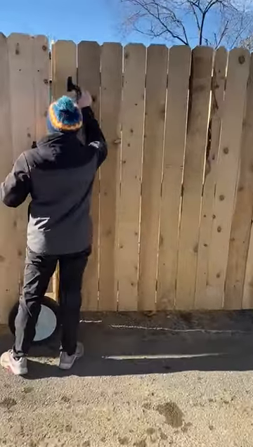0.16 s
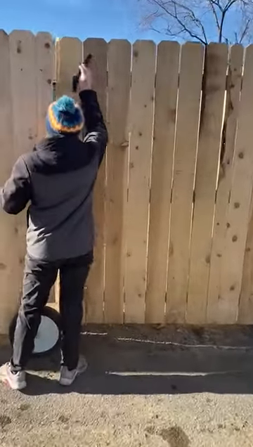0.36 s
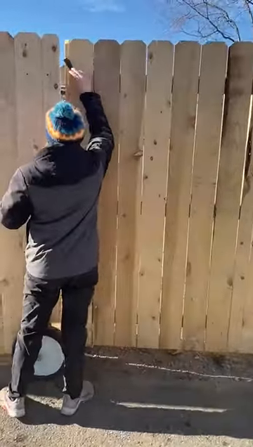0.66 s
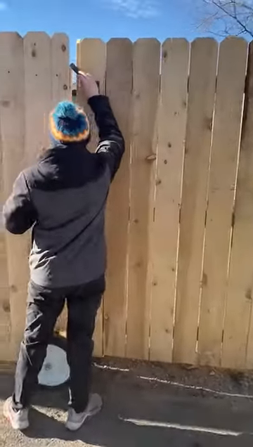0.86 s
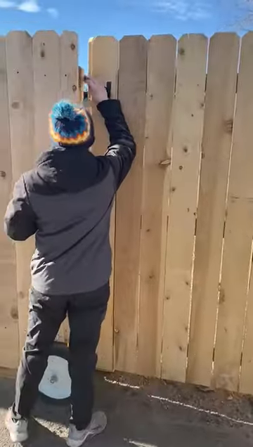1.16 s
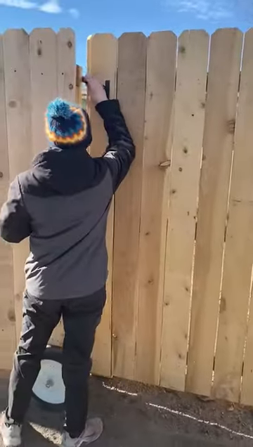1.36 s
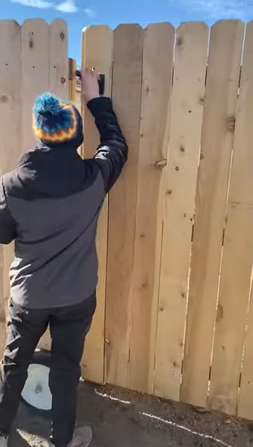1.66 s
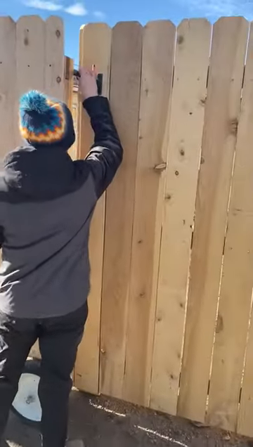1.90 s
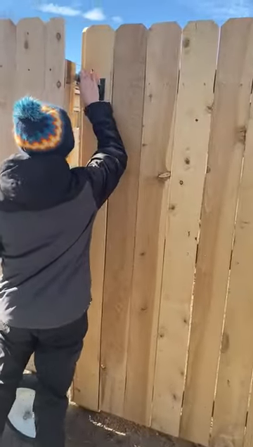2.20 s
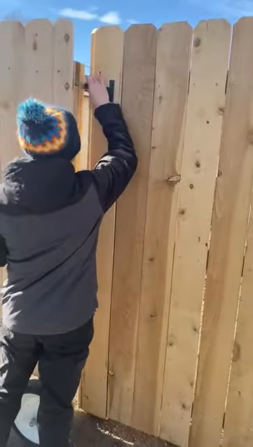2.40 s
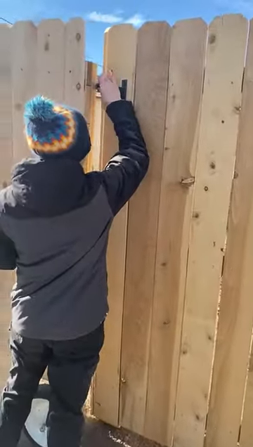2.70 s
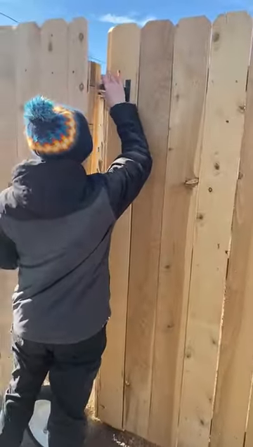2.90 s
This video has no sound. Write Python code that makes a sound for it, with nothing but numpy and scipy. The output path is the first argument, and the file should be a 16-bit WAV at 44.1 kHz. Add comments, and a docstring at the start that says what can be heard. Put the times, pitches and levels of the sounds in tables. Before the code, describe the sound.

A metal latch on a wooden gate, a few steps away outdoors. A faint tick and rasp at 0.1 s, then the loudest hollow clack at 0.55 with small rattles after. Soft low wind thumps near 0.6-1.0; brief scrape, then clustered bar knocks at 1.25. Bright ticks at 1.63 and 2.26, woody bumps and a scuff 2.2-2.4, faint knocks to 2.9. Wind rumble, distant wash, faint hiss and drone throughout.

```python
"""Wooden gate latch, outdoors

A hand works the metal latch of a wooden gate, a few steps from the microphone pair.
The lever clacks on its stop, the bar knocks free, then the gate bumps: dying sines plus noisy clatter.
The loose latch ticks in short modes, the pivot rasps in stick and slip, a sleeve rustles as gritty noise.
Wind rumbles on the microphone as low noise, over a distant wash, a fine hiss and a faint drone."""
import sys
import numpy as np
from scipy import signal
from scipy.fft import rfft, irfft
from scipy.io import wavfile
from scipy.ndimage import uniform_filter1d

SR = 44100
rng = np.random.default_rng(int(sys.argv[2]) if len(sys.argv) > 2 else 0)


def wav_out(sig):
    """Save sig, one row per channel (or a flat mono array), as 16-bit PCM at SR to the path in sys.argv[1]."""
    wavfile.write(sys.argv[1], SR, np.round(np.clip(np.atleast_2d(sig).T, -1, 1) * 32767).astype(np.int16))


N = 134505
T = np.arange(N) / SR
HZ = np.fft.rfftfreq(N, 1 / SR)
# Half a second for each short sound
SHORT_T = np.arange(SR // 2) / SR
SHORT_HZ = np.fft.rfftfreq(len(SHORT_T), 1 / SR)
EDGE_HZ = 11850  # top of the recorder's band
TICK_RISE_S = 0.00076  # build-up of ticks and slips

# Left-right likeness of air and rubs at the microphone pair: (frequency [Hz], likeness [0-1])
AIR_SAME = [(200, 1), (520, 0.51), (850, 0.52), (1200, 0.075), (1800, 0.5), (3500, 0.32), (5200, 1)]
# Left-right likeness of clatter and echoes: (frequency [Hz], likeness [0-1])
KNOCK_SAME = [(280, 1), (600, 1), (1100, 0.16), (1800, 0.53), (6000, 0.75), (10000, 1)]


def amp(db):
    """Decibels to gain."""
    return 10 ** (np.asarray(db) / 20)


def unit(x):
    """Scales to rms 1."""
    return x / np.sqrt(np.mean(x ** 2) + 1e-20)


def read(points, hz):
    """Reads a table on a log-frequency axis."""
    f, value = np.transpose(points)
    return np.interp(np.log(hz + 1), np.log(f + 1), value)


def level(points):
    """Gain over time from (time [s], level [dB]) points."""
    return amp(np.interp(T, *np.transpose(points)))


def add(mix, s, sound):
    """Mixes a sound in at s seconds."""
    part = mix[:, max(round(s * SR), 0):][:, :sound.shape[-1]]
    part += sound[..., :part.shape[1]]


def noise(colour_db, same, hz, size, contacts=1):
    """Coloured noise in two partly alike channels, steady or driven by contacts."""
    left, other = rfft(contacts * rng.standard_normal((2, size)))
    likeness = np.clip(read(same, hz), -1, 1)
    right = likeness * left + np.sqrt(1 - likeness ** 2) * other
    return unit(irfft(np.array([left, right]) * amp(colour_db), size))


def place(x, side, lead):
    """Level and phase difference between the two microphones, split evenly over both."""
    half = amp(read(side, HZ) / 2) * np.exp(.5j * read(lead, HZ))
    return irfft(rfft(x) * np.array([half, 1 / half]), N)


def ring(modes, rise_s):
    """Dying sines of alternating sign that build up while the parts are in contact."""
    total = 0
    for k, (hz, db, t60) in enumerate(modes):
        decay = amp(db - 60 * SHORT_T / t60)
        total = total + (-1) ** k * decay * np.sin(2 * np.pi * hz * SHORT_T)
    return (1 - np.exp(-SHORT_T / rise_s)) * total


def chatter(per_s, fall_db):
    """Contacts at uneven gaps and of uneven strength; the level falls from each until the next."""
    spread_db = 1
    gap, size = rng.standard_normal((200, 2)).T
    starts = np.r_[0, np.cumsum(np.exp(.5 * gap[1:]))] / per_s
    latest = np.searchsorted(starts, SHORT_T, "right") - 1
    fall = fall_db * (SHORT_T - starts[latest]) * per_s
    return amp(spread_db * size[latest] + fall)


def outdoors(waver_hz=3):
    """A distant wash that swells, a steady fine hiss and a faint wavering drone."""
    # Colour of the open air: (frequency [Hz], level [dB])
    air_colour = [(110, -19), (180, -2), (300, -4), (520, -8), (760, -6.5), (1100, -11), (2200, -24.5),
                  (3200, -32.5), (5200, -34.5), (6800, -58), (9500, -43.5), (12000, -47.5)]
    # Swell of the wash: (time [s], level [dB])
    wash_db = [(0, -49.5), (.5, -47), (.65, -45.5), (.87, -47.5), (1.4, -46), (1.7, -47.5), (2.15, -47),
               (2.45, -41.5), (2.7, -45), (3.05, -43)]
    # Swell of the distant drone: (time [s], level [dB])
    drone_db = [(0, -40), (0.149, -44), (1.75, -51.5), (1.88, -39), (2.03, -35), (2.2, -49.5), (3.05, -42)]
    drone_hz, wash_top_hz, hiss_db = 126, 2670, -47.5
    waver = unit(uniform_filter1d(rng.standard_normal(N), size=4000))
    drone = level(drone_db) * np.sin(2 * np.pi * np.cumsum(drone_hz + waver_hz * waver) / SR)
    air = noise(read(air_colour, HZ), AIR_SAME, HZ, N)
    wash = irfft(rfft(air) / (1 + (HZ / wash_top_hz) ** 4), N)
    hiss = air - wash
    return level(wash_db) * wash + amp(hiss_db) * hiss + drone


def wind():
    """Gusting rumble of low noise, with a few soft thumps of wind and handling as dying sines."""
    # Colour of the rumble: (frequency [Hz], level [dB])
    rumble_colour = [(18, -36), (30, -9.5), (50, 2), (90, -1), (120, -4.5), (180, -10.5), (300, -22.5),
                     (500, -44), (900, -91.5)]
    # Gusts: (time [s], level [dB])
    gusts_db = [(0, -50.5), (.15, -38.5), (.36, -39), (.43, -36), (.55, -38.5), (.7, -34.5), (.82, -31.5),
                (.91, -36.5), (1.0, -33.5), (1.2, -36), (1.55, -40.5), (1.66, -36.5), (1.74, -43.5),
                (2.2, -40.5), (2.55, -39), (3.05, -40)]
    # Left-right likeness of the rumble: (frequency [Hz], likeness [0-1])
    rumble_same = [(30, 0.96), (130, 0.98)]
    # Soft low thumps: (time [s], level [dB], frequency [Hz], rise [s], t60 [s])
    thumps = [(.58, -20, 51.8, 0.018, 0.23), (0.937, -10.5, 63, 0.04, 0.27),
              (1.039, -16.5, 116, 0.001, 0.08)]
    out = level(gusts_db) * noise(read(rumble_colour, HZ), rumble_same, HZ, N)
    for s, db, hz, rise_s, t60 in thumps:
        add(out, s, ring([(hz, db, t60)], rise_s))
    return out


def ticks():
    """Small, quickly damped metal contacts of the loose latch, each with a grain of noise."""
    # When the latch ticks: (time [s], level [dB])
    tick_times = [(0.061, -34.5), (0.7762, -39), (1.473, -40), (1.6313, -18), (1.722, -36), (1.9654, -34),
                  (2.083, -29.5), (2.2648, -16), (2.523, -37), (2.554, -38.5)]
    # Modes of a tick: (frequency [Hz], level [dB], t60 [s])
    tick_modes = [(1486, -9, 0.014), (1700, -6.5, 0.0084), (2170, -4.5, 0.0078), (4210, -7.5, 0.0039),
                  (4940, -10.5, 0.0062), (5870, -5, 0.0036), (9090, -14.5, 0.0065), (10000, -25, 0.0098)]
    grit_db, grit_decay_s = -24, 0.0032
    out = np.zeros((2, N))
    for s, db in tick_times:
        grit = rng.standard_normal((2, len(SHORT_T))) * np.exp(-SHORT_T / grit_decay_s)
        add(out, s, amp(db) * (ring(tick_modes, TICK_RISE_S) + amp(grit_db) * grit))
    return out


def rasp():
    """Stick and slip of metal on metal: each slip differs in time, strength and pitch."""
    # The lever rasps as it turns, the bar as it slides free:
    # (time [s], length [s], mid level at the start [dB], mid level at the end [dB])
    strokes = [(0.091, .108, -46.5, -48.5), (1.148, 0.12, -56, -48)]
    # Modes of a slip before detuning: (frequency [Hz], level [dB], t60 [s])
    slip_modes = [(3470, -10, 0.013), (4120, -4, 0.011), (4800, -1.5, 0.012), (5440, -4, 0.01)]
    slips_per_s, spread_db, detune = 220, 3, 0.022  # rate at the median gap; detune as a fraction
    out = np.zeros((2, N))
    for start, length, start_db, end_db in strokes:
        gap, size, pitch = rng.standard_normal((80, 3)).T
        slip_times = np.cumsum(np.exp(.5 * gap)) / slips_per_s
        for s, z, p in zip(slip_times, size, pitch):
            if s < length:
                modes = [(hz * (1 + detune * p), db, t60) for hz, db, t60 in slip_modes]
                db = np.interp(s, [0, length], [start_db, end_db]) + spread_db * z
                add(out, start + s, amp(db) * ring(modes, TICK_RISE_S))
    return out


def rubs():
    """Gritty friction, a run of tiny catches that swells or fades with each movement."""
    # Rubs of sleeve and latch: (time [s], length [s], level at the start [dB], level at the end [dB],
    # treble tilt [dB per octave])
    movements = [(0.304, 0.26, -54, -67.5, 0.5), (0.77, 0.036, -56.5, -62.5, 2.5),
                 (0.999, 0.14, -60, -62.5, -0.5), (1.139, 0.14, -61.5, -52, 0.5),
                 (1.917, 0.195, -61.5, -60.5, 2), (2.342, 0.085, -36.5, -58, -3.5),
                 (2.516, 0.05, -52.5, -53, 1.5)]
    # Colour of a rub before the tilt: (frequency [Hz], level [dB])
    rub_colour = [(500, -38), (1800, 11.5), (3000, 4.5), (4200, 1.5), (5600, 4), (7000, -24), (9500, -5.5),
                  (11500, -13)]
    edge_share, pivot_hz = 0.14, 4000  # fade as a share of the length; centre of the tilt
    catches_per_s, catch_fall_db = 140, -5.5  # rate and fall over the median gap
    out = np.zeros((2, N))
    for s, length, start_db, end_db, tilt_db in movements:
        edge_s = edge_share * length
        edge = np.clip(np.minimum(SHORT_T, length + edge_s - SHORT_T) / edge_s, 0, 1)
        tilt = tilt_db * np.log2(np.clip(SHORT_HZ, 1, EDGE_HZ) / pivot_hz)
        colour = read(rub_colour, SHORT_HZ) + tilt
        catches = chatter(catches_per_s, catch_fall_db)
        grit = noise(colour, AIR_SAME, SHORT_HZ, len(SHORT_T), catches)
        swell = amp(np.interp(SHORT_T, [0, length], [start_db, end_db]))
        add(out, s, edge * swell * grit)
    return out


def clatter(t60, bass_db, treble_db):
    """Loose hardware rattles the dense modes of the boards; low ones start and die slowest."""
    # Colour of the boards before the bass and treble shelves: (frequency [Hz], level [dB])
    board_colour = [(100, -9), (220, -0.5), (600, -3.5), (1100, -1), (1600, -5), (2300, -9), (3000, -23),
                    (3800, -24), (5200, -26), (7500, -47), (11000, -39.5)]
    bass_hz, treble_hz = 497, 2150
    rise_s, decay_slope = 0.0018, 0.42  # rise at 1 kHz; power of frequency that speeds the decay
    rattles_per_s, rattle_fall_db = 260, -11.5  # rate and fall over the median gap
    bass = bass_db / (1 + (SHORT_HZ / bass_hz) ** 4)
    treble = treble_db * (1 - 1 / (1 + (SHORT_HZ / treble_hz) ** 4))
    colour = read(board_colour, SHORT_HZ) + bass + treble
    rattles = chatter(rattles_per_s, rattle_fall_db)
    spectrum = rfft(noise(colour, KNOCK_SAME, SHORT_HZ, len(SHORT_T), rattles))
    centres = np.geomspace(200, 8000, 6)
    out = 0
    for centre in centres:
        khz = centre / 1000
        rise = 1 - np.exp(-SHORT_T * khz / rise_s)
        decay = amp(-60 * SHORT_T / t60 * khz ** decay_slope)
        # Overlapping triangular bands, one around each centre
        band = read(list(zip(centres, centres == centre)), SHORT_HZ)
        out = out + rise * decay * irfft(spectrum * band, len(SHORT_T))
    return out


def knocks():
    """Each blow rings one part, which loses level as it seats on its stop, and shakes the boards."""
    # Modes of each part: (frequency [Hz], level [dB], t60 [s])
    parts = {"lever": [(224.7, -14.5, 0.18), (312.3, -20.5, 0.19), (573, -21, 0.12), (630, -22, 0.072),
                       (941, -1.5, 0.07), (1130, -10, 0.061), (1500, -15, 0.042), (1614, -14, 0.042),
                       (1740, -9.5, 0.039), (2120, -27, 0.049), (2820, -25.5, 0.076)], "bar": [(254, -14, 0.31), (382, -15.5, 0.15), (496, -21.5, 0.12),
                                             (698, -7, 0.065), (961, -11, 0.11), (1058, 3.5, 0.028),
                                             (1163, -7.5, 0.076), (1333, -6.5, 0.053), (1546, 0.5, 0.026),
                                             (1845, -8.5, 0.038), (2250, -6, 0.03)], "boards": [(383, -5.5, 0.15), (527, -4, 0.072),
                                                                    (622, -7.5, 0.17), (778, -8.5, 0.13),
                                                                    (950, -12, 0.057), (1236, -1, 0.04),
                                                                    (1550, 3.5, 0.039), (1943, -9.5, .06),
                                                                    (2246, -4.5, 0.041),
                                                                    (2730, -13.5, 0.042), (2900, -8, 0.028),
                                                                    (3235, -14, 0.034)]}
    # Blows: (time [s], part that rings, ring level before seating [dB], ring build-up [s],
    # clatter level [dB], clatter t60 at 1 kHz [s], clatter bass [dB], clatter treble [dB])
    blows = [(0.5507, "lever", -5.5, 0.0053, -22, 0.11, 4.5, 6.5),
             (0.580, "boards", -42.5, 0.0044, -38, 0.11, 12, -15.5),
             (0.602, "lever", -29, 0.002, -36, 0.11, 8.5, -1),
             (0.636, "boards", -52, 0.003, -44, 0.089, 12, -4),
             (0.697, "boards", -55, 0.004, -41, 0.089, 14, -27.5),
             (0.801, "boards", -49, 0.0083, -34, 0.076, 10.5, -34),
             (1.2504, "bar", -38, 0.0032, -35, 0.13, -8, -5),
             (1.2602, "bar", -14.5, 0.0031, -29.5, 0.097, -8, 6),
             (1.271, "bar", -26, 0.0011, -26.5, 0.11, 6, -11),
             (1.3057, "bar", -35.5, 0.002, -41.5, 0.066, -1, 2.5),
             (2.2084, "boards", -39.5, 0.00094, -33.5, 0.18, -11, -10),
             (2.2136, "bar", -23.5, 0.0032, -29.5, 0.072, -6, -5.5),
             (2.3500, "boards", -27.5, 0.00055, -29, 0.053, -7, -4),
             (2.3595, "boards", -31, 0.0022, -30, 0.12, 8.5, 6),
             (2.3898, "boards", -26.5, 0.00037, -31.5, 0.14, -5.5, -8),
             (2.4, "boards", -39, 0.0023, -30.5, 0.083, 7, -21),
             (2.595, "boards", -44.5, 0.0022, -36.5, 0.1, 5.5, -22),
             (2.708, "boards", -51, 0.0061, -34.5, 0.12, 3.5, -37),
             (2.893, "bar", -31, 0.0019, -31.5, 0.053, -9, -23)]
    # How long each part rings freely before it seats: part -> time [s]
    free_s = {"lever": .013, "bar": 0.0098, "boards": .008}
    seat_s, seat_db = 0.0086, -5  # time taken to seat, level change once seated
    out = np.zeros((2, N))
    for s, part, ring_db, rise_s, clatter_db, t60, bass_db, treble_db in blows:
        seated = np.clip((SHORT_T - free_s[part]) / seat_s, 0, 1)
        ringing = amp(ring_db + seat_db * seated) * ring(parts[part], rise_s)
        shaking = amp(clatter_db) * clatter(t60, bass_db, treble_db)
        add(out, s, ringing + shaking)
    return out


def yard(x, dull_hz=1500):
    """Weak, dull echoes from the fence and the ground, as a swelling and dying tail of noise."""
    echo_db, t60_s, swell_s = -30.5, 0.32, 0.019
    colour = -10 * np.log10(1 + (SHORT_HZ / dull_hz) ** 4)
    tail = noise(colour, KNOCK_SAME, SHORT_HZ, len(SHORT_T))
    tail = tail * amp(-60 * SHORT_T / t60_s) * np.minimum(SHORT_T / swell_s, 1) ** 2
    return amp(echo_db) * signal.fftconvolve(x, tail / np.linalg.norm(tail[0]), axes=1)[:, :N]


def scene():
    """The gate in its yard, with wind and background, as the microphone pair hears them."""
    # Left minus right, background and rubs: (frequency [Hz], difference [dB])
    air_side = [(340, -1), (620, 4), (1050, 7), (2000, -0.5), (3700, 0)]
    # Phase by which left leads, background and rubs: (frequency [Hz], lead [rad])
    air_lead = [(200, 0), (520, 0.72), (1000, 0.68), (2000, 0.54), (3100, 0.96), (6000, 1.6), (10000, 1.38)]
    # Left minus right, gate: (frequency [Hz], difference [dB])
    gate_side = [(400, -0.5), (550, 7.5), (1000, 10.5), (1300, 6.5), (1700, 0), (2200, -2), (2800, -9.5),
                 (4000, -2), (10000, 0)]
    # Phase by which left leads, gate: (frequency [Hz], lead [rad])
    gate_lead = [(280, -1), (520, 1.37), (900, 0.84), (1280, -2), (1550, -.5), (2300, 1.08), (3700, 1.4),
                 (5500, 0.9), (7300, 3.5), (9400, 3)]
    gate = knocks() + ticks() + rasp()
    near = place(gate + yard(gate), gate_side, gate_lead)
    around = place(rubs() + outdoors(), air_side, air_lead)
    return near + around + wind()


def record(dry):
    """The recorder's band limit, a steep low-pass."""
    low_pass = signal.firwin(301, EDGE_HZ, window=("kaiser", 8), fs=SR)
    return signal.oaconvolve(dry, low_pass[None], "same")


dry = scene()
out = record(dry)
wav_out(out)
```